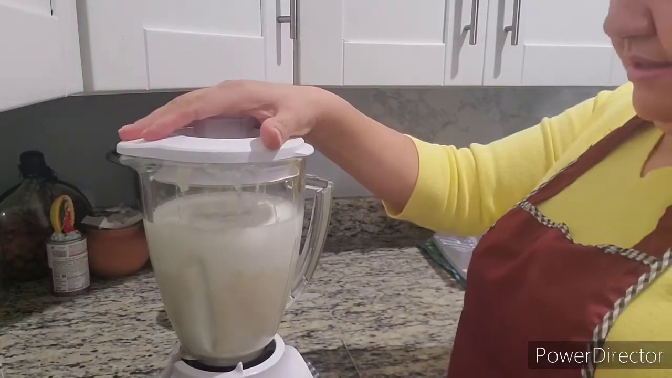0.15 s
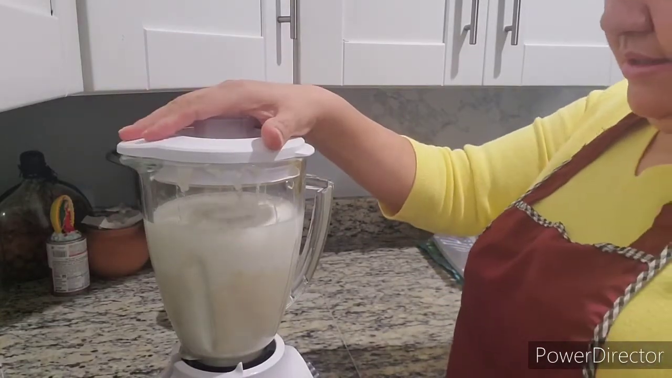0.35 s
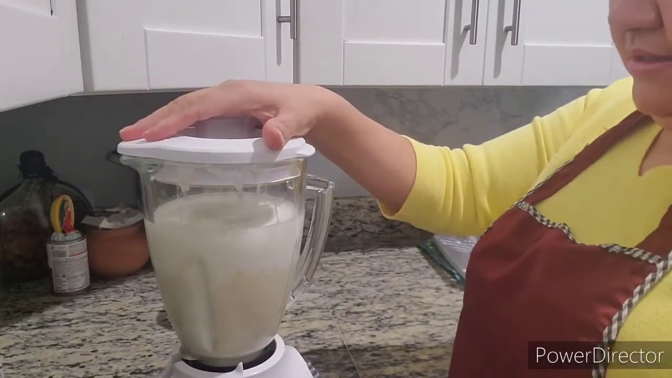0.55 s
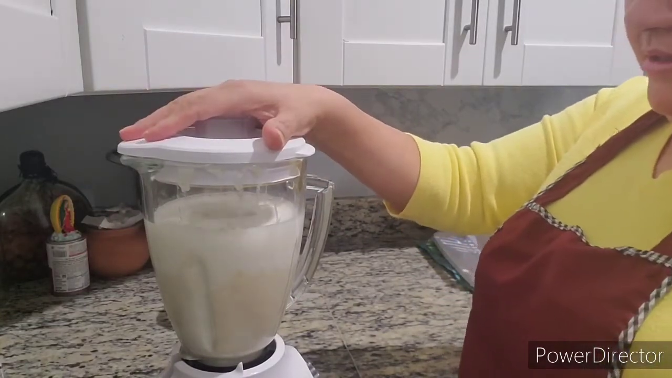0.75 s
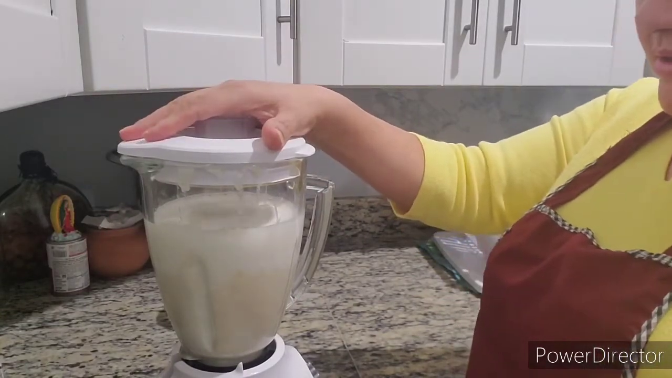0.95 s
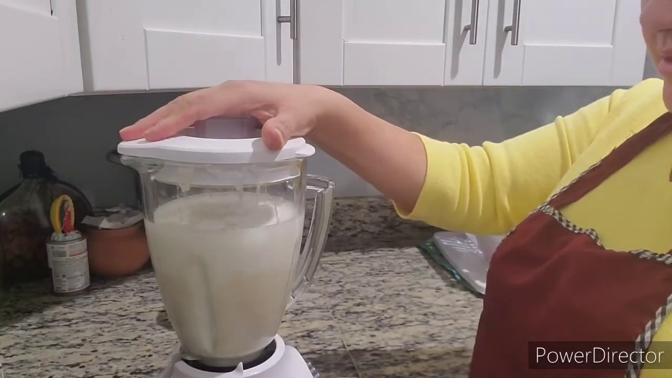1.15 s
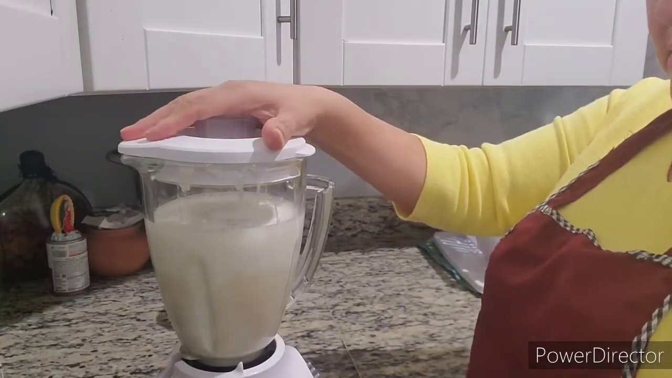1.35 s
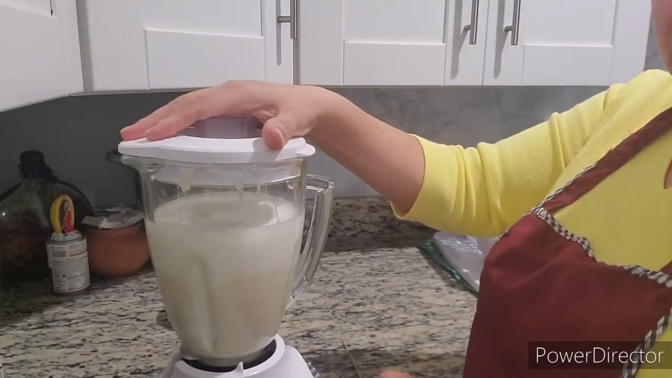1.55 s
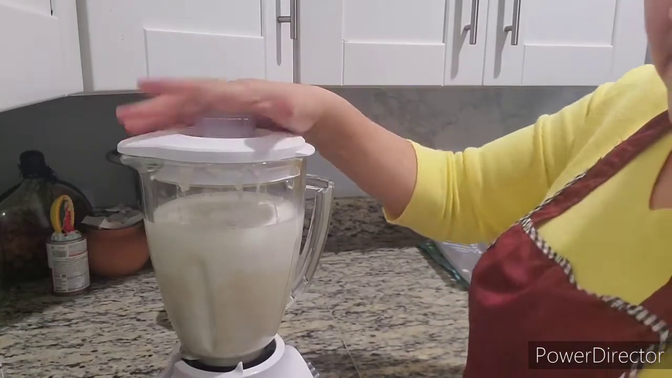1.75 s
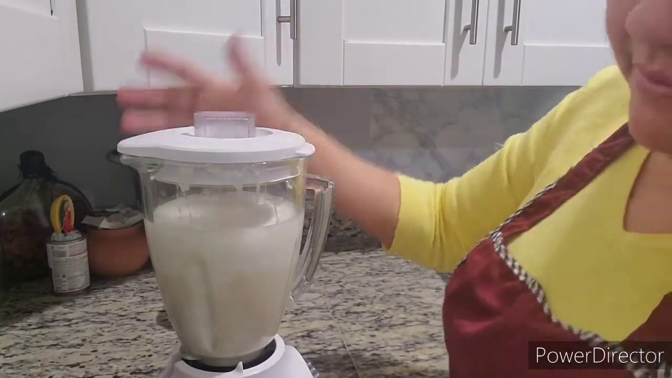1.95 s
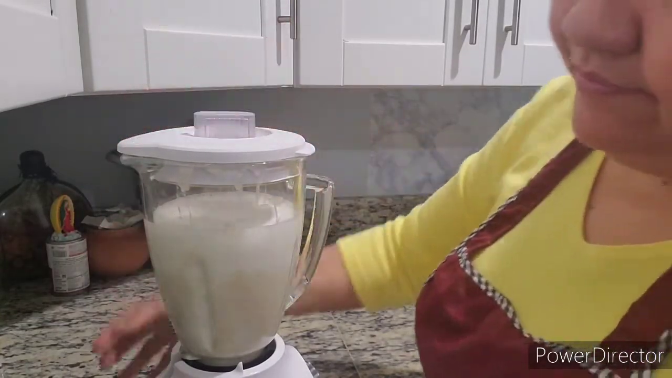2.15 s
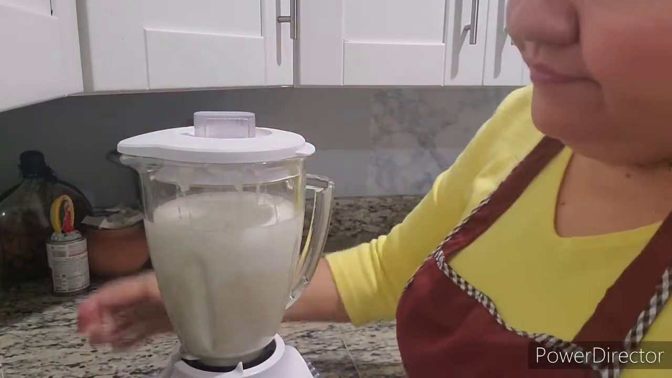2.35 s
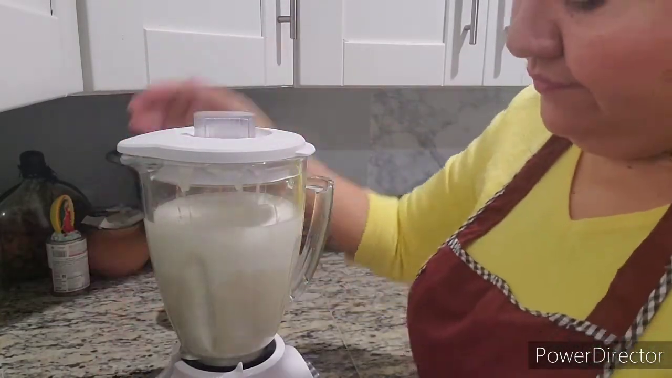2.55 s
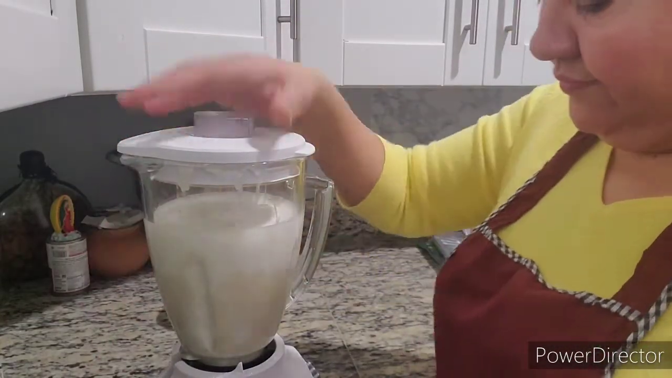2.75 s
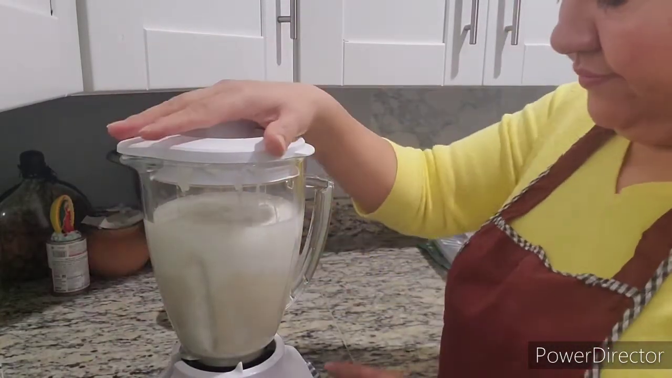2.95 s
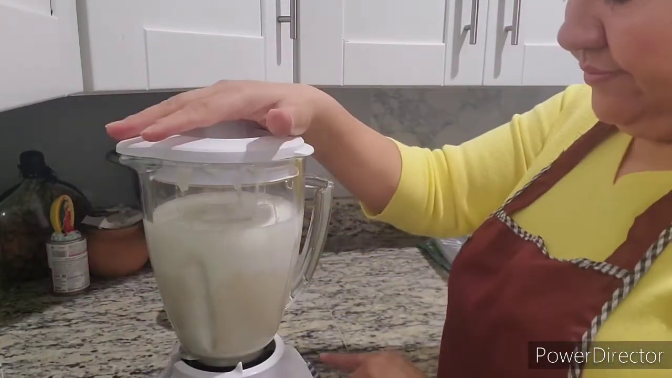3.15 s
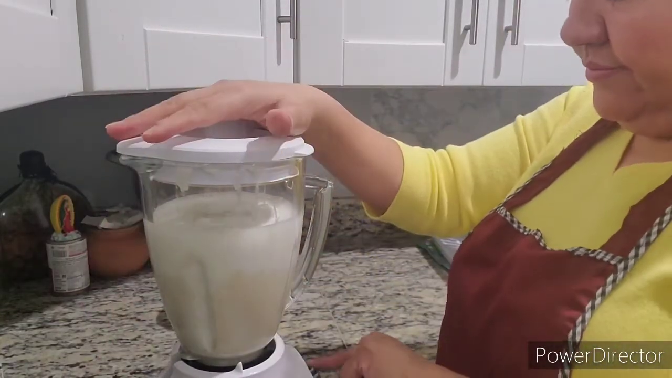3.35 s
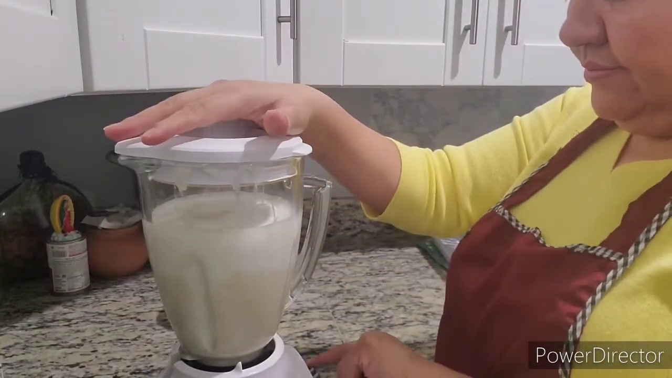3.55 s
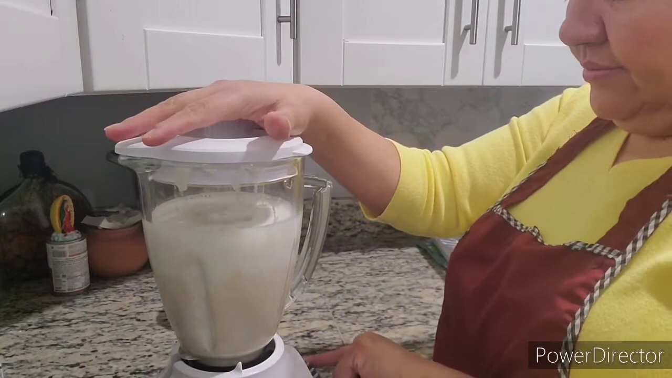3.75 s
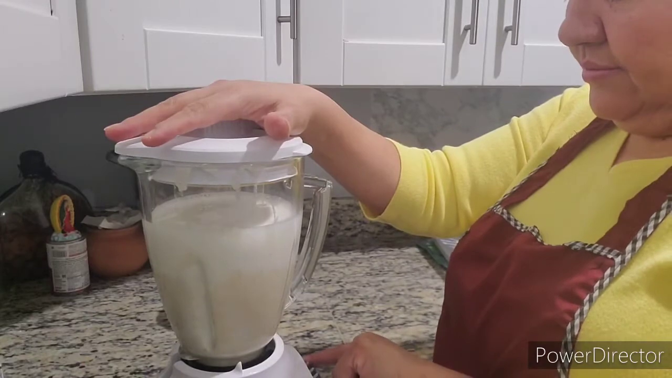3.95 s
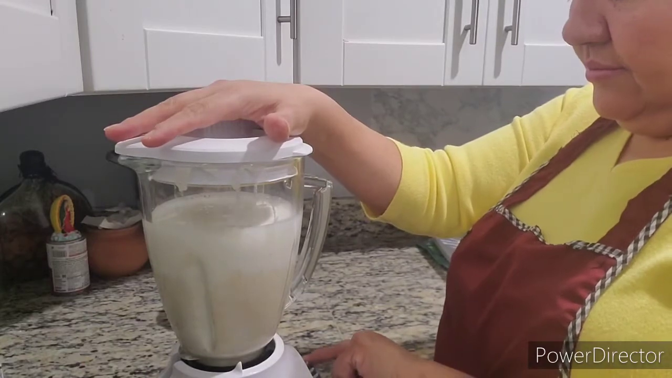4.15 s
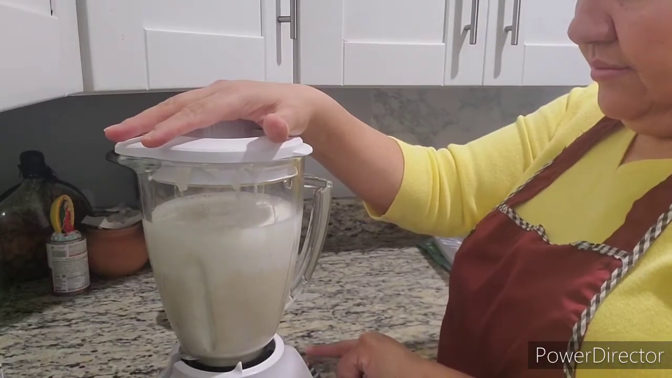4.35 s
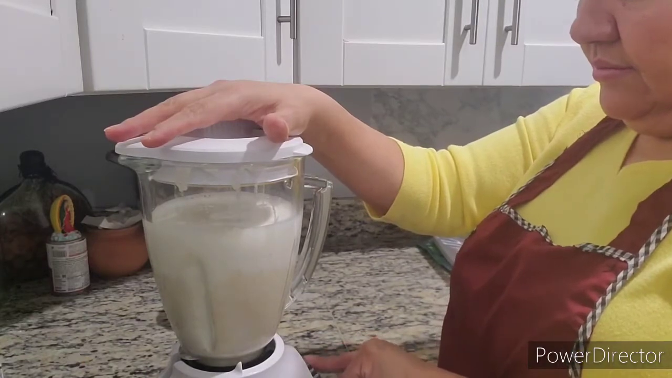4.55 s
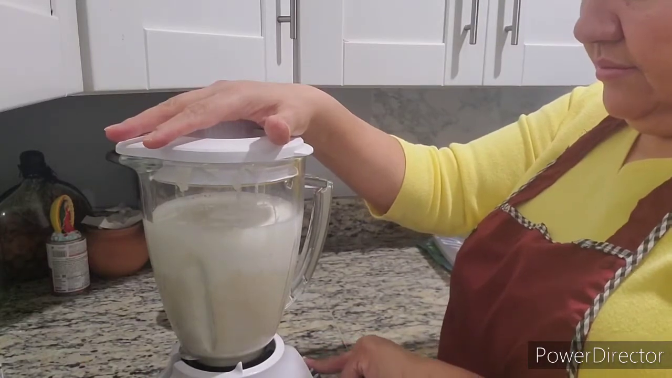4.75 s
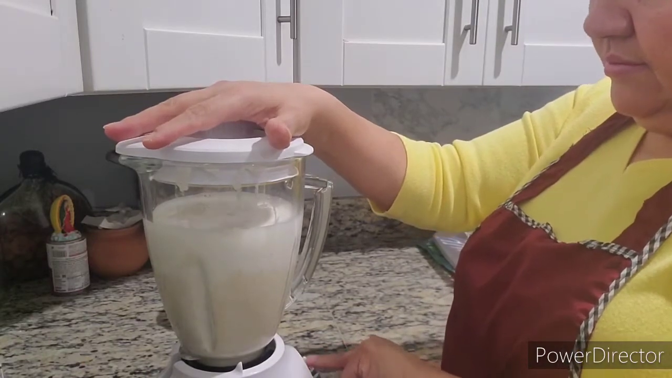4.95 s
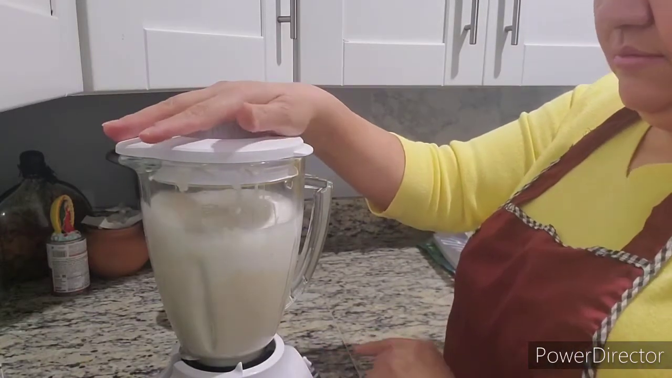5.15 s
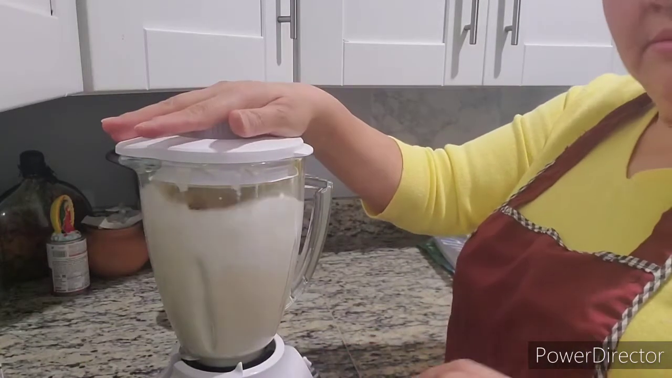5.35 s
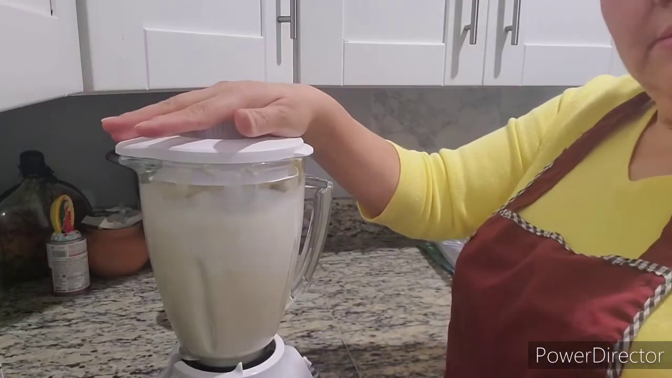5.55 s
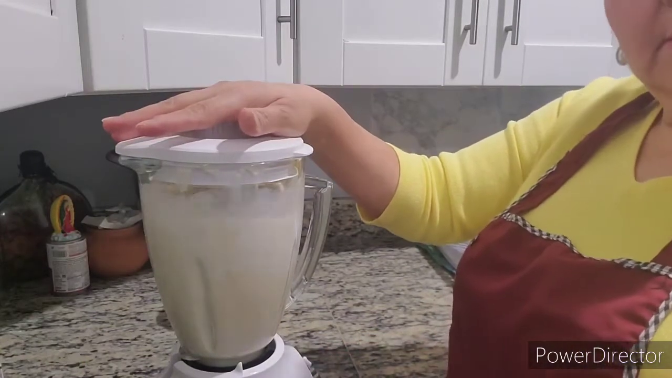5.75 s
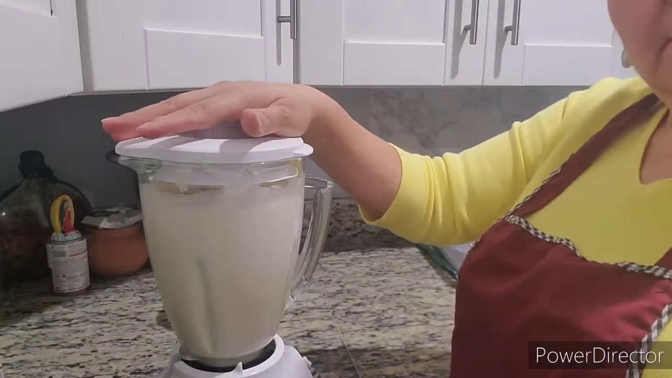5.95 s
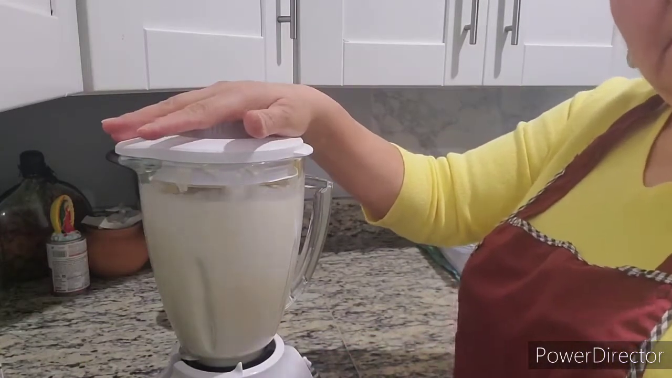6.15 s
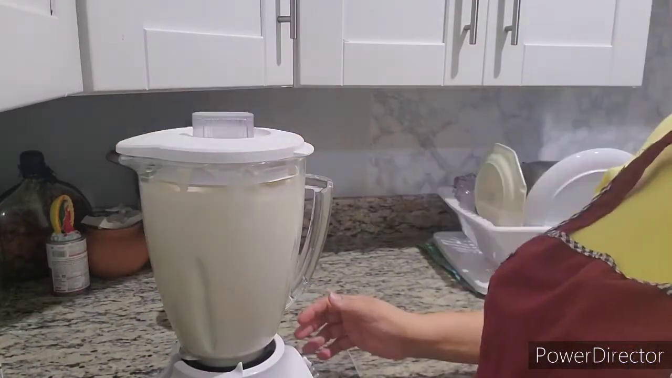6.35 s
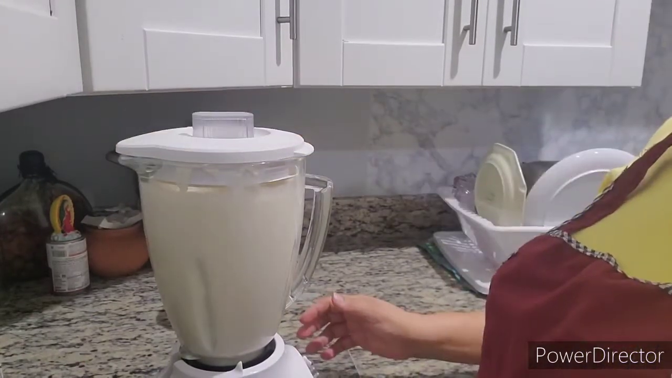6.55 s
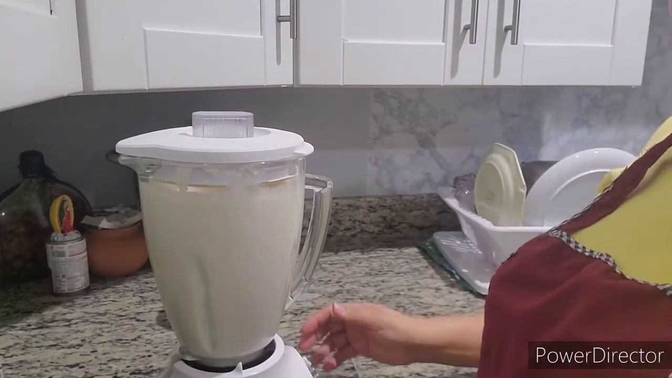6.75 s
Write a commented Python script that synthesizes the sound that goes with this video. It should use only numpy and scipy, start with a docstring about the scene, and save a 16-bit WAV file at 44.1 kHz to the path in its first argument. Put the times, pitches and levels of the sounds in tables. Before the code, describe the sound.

In a quiet humming kitchen, light plastic knocks and skin squeaks precede a hard click; a blender surges up, churning, then brightens into a rattling whine.

```python
"""Over a low room hum, squeaks, rustles and taps are heard as a hand tries the lid and buttons of a blender.
The switch snaps in: hum at multiples of the mains rate and tones locked to the shaft glide up as it winds up.
Filtered noise and random impulses make the churning mix, which leaps against the lid; as a vortex opens
the blades cut into its air, and collapsing cavities ring the resonances of the jar."""
import sys
import numpy as np
from scipy import signal
from scipy.fft import rfft, irfft, next_fast_len
from scipy.io import wavfile

SR = 44100
rng = np.random.default_rng(int(sys.argv[2]) if len(sys.argv) > 2 else 0)


def unload_audio(sound):
    """Save the sound as a 16-bit wav file, at the path given as the first command line argument."""
    columns = np.transpose(np.atleast_2d(sound))
    # keep every value between -1 and 1, then stretch to whole-number steps
    steps = np.round(np.clip(columns, -1, 1) * 32767)
    wavfile.write(sys.argv[1], SR, steps.astype(np.int16))


N = 299553
TIME = np.arange(N) / SR
MAINS_HZ, CUTOFF_HZ = 60, 15500

# In all tables density_db is relative power per Hz, gain_db a relative strength; levels precede any echoes.
# smooth spectrum of the room's air: [freq_hz, density_db]
ROOM_SPECTRUM = [(20, -15), (54, 2.5), (170, -1.5), (220, -6), (282, -13.5), (372, -9), (580, -23),
                 (860, -29), (1200, -32), (1540, -38.5), (2500, -46.5), (6500, -43.5), (8200, -49.5),
                 (15500, -50)]
# steady hum of an appliance: [pitch_hz, rms_db]
ROOM_LINES = [(59.2, -68), (118.4, -58.5), (215.3, -59), (236.9, -59.5), (360.7, -71)]
# thin high tone in the room, and its momentary fade: centre, 1/e half-width, depth
THIN_TONE_HZ, THIN_TONE_DB = 1184, -75
FADE_S, FADE_HALF_S, FADE_DB = 2.45, .42, 16

# strokes of sleeve and palm, with 1/e rise and fall: [peak_s, rise_s, fall_s, level_db]
BRUSHES = [(0.87, .22, .2, -73.5), (1.37, 0.16, 0.27, -75.5), (2.15, 0.42, .2, -77),
           (2.58, 0.13, 0.14, -72), (2.83, 0.11, 0.13, -62.5), (3.35, .25, .2, -70), (3.72, .1, .16, -76),
           (4.35, 0.29, 0.25, -81), (4.72, 0.042, 0.033, -63)]
# smooth spectrum of the rustle: [freq_hz, density_db]
CLOTH_SPECTRUM = [(500, -16), (1500, -2), (3500, 0), (5000, -5), (8000, -12), (15000, -17)]
# skin squeaking over plastic; glide and unsteadiness are shares of the pitch:
# [start_s, length_s, pitch_hz, glide_ratio, unsteady_ratio, level_db]
SQUEAKS = [(2.502, 0.05, 3200, .07, .05, -60), (2.5, 0.07, 1900, .05, .09, -70),
           (2.72, 0.12, 2850, 0, .035, -64.5), (2.74, 0.11, 3960, 0, .02, -67.5),
           (2.75, 0.1, 5300, 0, .025, -75), (3.224, 0.18, 2080, 0.034, .018, -68),
           (3.263, 0.12, 7480, 0, .01, -78)]

# taps, buttons and, last, the switch; ring_peak_db is the peak of the housing's ring, the rest are relative:
# [start_s, ring_peak_db, thump_db, click_db, tick_db, left_right_db]
TAPS = [(0.376, -20.5, -36.5, -39.5, -40.5, 1), (0.556, -33.5, -48, -56, -65, 2),
        (1.048, -37, -53, -45, -52.5, 3), (1.326, -48, -50, -67, -75, 4), (1.519, -48, -48, -67, -85, 4),
        (1.704, -51.5, -49, -64, -62, 3), (2.888, -35.5, -34, -41.5, -52, 3.0),
        (2.911, -29, -46, -42.5, -61, 0), (3.115, -40, -42, -43, -52, 1.5),
        (3.383, -33.5, -50, -44.5, -53, 3), (3.59, -31, -34.5, -73, -83, 1),
        (3.621, -42, -51, -46, -77, 3.5), (3.815, -54, -58, -64, -80, 2),
        (4.186, -48.5, -47, -57, -52.5, 3), (4.425, -46, -55, -54.5, -77, 5.5),
        (4.68, -44, -47, -70, -77, 1), (4.735, -16, -33, -21.5, -25, 3)]
# resonances of the plastic housing and lid: [mode_hz, width_hz, gain_db]
HOUSING_MODES = [(354, 33, 0), (506, 72, 4), (706, 57, 1.5), (828.5, 29, 1), (1007, 190, -10.5),
                 (1247, 91, 0), (1856, 20, -25), (2086, 53, -17.5), (2850, 115, -15), (3470, 120, -17),
                 (4380, 33, -26)]
# smooth spectrum of the dull thump: [freq_hz, density_db]
THUMP_SPECTRUM = [(20, -7), (50, 10.5), (110, 3.5), (250, 6), (600, -44)]
# smooth spectrum of the click of a hard contact: [freq_hz, density_db]
CLICK_SPECTRUM = [(900, 8), (1700, 2), (2700, 2.5), (4300, 2.5), (7000, -8.5), (9500, -30), (15000, -35)]
# smooth spectrum of its bright tick: [freq_hz, density_db]
TICK_SPECTRUM = [(4000, -12), (8000, -1.5), (15000, -3)]

# course of the blend (s): switch closes, mix leaps, vortex opens, it reaches the blades, blades break free
SWITCH_S, SURGE_S, VORTEX_S, DEEP_S, FREE_S = 4.737, 5.29, 5.34, 5.94, 6.625
# spin-up in the thick mix: first kick and full load (turns per s), time constant (s)
KICK_SPEED, LOADED_SPEED, SPIN_UP_S = 38, 147, .155
# vortex: speed gain (turns per s), time constant (s), creep (turns per s, each s), last jump (turns per s)
VORTEX_GAIN, UNLOAD_S, CREEP_PER_S, FREE_GAIN = 58, .18, 12.7, 3.1
# the surge: added level (dB), 1/e rise and fall (s)
SURGE_DB, SURGE_RISE_S, SURGE_FALL_S = 7, 0.09, .06

# smooth spectrum of the sloshing mix: [freq_hz, density_db]
SLOSH_SPECTRUM = [(15, -20), (35, -15), (60, 14), (95, 15.5), (160, 12), (300, -36), (700, -50)]
# lumps of the mix flopping back onto the blades: [peak_s, level_db]
FLOPS = [(4.88, -35), (5.02, -29), (5.35, -28), (5.46, -33), (5.8, -38), (6.14, -44), (6.44, -42)]
FLOP_RISE_S, FLOP_FALL_S = 0.02, 0.049
# smooth spectrum of the churned mix: [freq_hz, density_db]
CHURN_SPECTRUM = [(110, -15), (180, -0.5), (260, -5.5), (350, -1), (550, -1), (630, -12), (1050, 0),
                  (1380, 3), (1600, -6), (2200, -14), (3800, -20), (4600, -28), (7000, -52)]
# resonances of the base and the liquid: [mode_hz, width_hz, gain_db]
BASE_MODES = [(366, 38, 2), (400, 27, -18), (509.5, 29.5, 4), (717, 29, 1), (818, 43, 2), (1031, 66, 4),
              (1150, 40, -8), (1409, 44, 0)]
# smooth spectrum of the froth: [freq_hz, density_db]
FROTH_SPECTRUM = [(1100, -41), (1700, 6.5), (2500, -7), (3250, -0.5), (3600, 7), (4400, -5.5), (6000, -9),
                  (9000, -43)]
# smooth spectrum of the hiss of fan and brushes: [freq_hz, density_db]
HISS_SPECTRUM = [(2500, -11.5), (4000, -3), (4600, -7), (5200, 0), (5800, -6), (7000, -3), (7700, -7.5),
                 (8150, -6), (9200, -9), (13200, -9.5), (15500, -17.5)]
# resonances of the filled jar, low group: [mode_hz, width_hz, gain_db]
JAR_LOW_MODES = [(1875, 26, -12.5), (2154, 65, -4), (2207, 27, 0), (2298, 37, -2)]
# resonances of the filled jar, high group: [mode_hz, width_hz, gain_db]
JAR_HIGH_MODES = [(2437, 77, -3.5), (2698, 127, -1), (2870, 127, -2.5), (3002, 43, 3), (3163, 82, -4),
                  (4066, 47, -10), (4475, 72, -11.5), (5380, 23, -19)]
# reference levels (relative dB), and fading while the vortex thins the mix (dB per s)
CHURN_DB, CHURN_FADE_DB_PER_S = -24.5, 5
HISS_DB, HISS_FADE_DB_PER_S = -26.5, 1.4
SLOSH_DB, SLOSH_FADE_DB_PER_S = -44.5, 6
# midpoint of the onset of cavitation (turns per s)
CAVITATION_SPEED = 101
# jar rings (relative dB): thick mix, gain in the vortex, further gain when deep (high only), loss when free
LOW_RING_DB, LOW_VORTEX_DB, LOW_FREE_DB = -26.2, 8.3, 4.5
HIGH_RING_DB, HIGH_VORTEX_DB, HIGH_DEEP_DB, HIGH_FREE_DB = -27, 3.5, 4.5, 4
# left-right balance of the ring (dB): usual, and while the vortex is deep
RING_PAN_DB, DEEP_PAN_DB = 2.5, -3.5

# mains hum, whose current falls as the motor gathers speed; loss is per turn per s:
# [mains_multiple, standstill_db, loss_db]
HUM = [(2, -12, .148), (6, -29, 0.1)]
# shaking of the base by the unbalanced shaft, against its speed in turns per s: [speed_hz, level_db]
IMBALANCE = [(80, -49), (114, -24.5), (129, -32.5), (146, -25), (172, -26), (188, -42.5), (207, -32),
             (224, -37)]
# rotor tones before load and surge: [speed_multiple, thick_db, vortex_db, free_db]
ROTOR_TONES = [(2, -43.5, -42, -33), (3, -37, -45.5, -46), (4, -28, -39.5, -53), (5, -41, -46, -47),
               (72, -58, -51, -53)]
# commutator whine at full load, and the jar resonance that lifts it near top speed
WHINE_DB, WHINE_LIFT_DB = -35, 14
WHINE_PEAK_HZ, WHINE_WIDTH_HZ = 2668, 58


def from_db(db):
    """Amplitude ratio: 20 dB is a factor of ten."""
    return 10 ** (np.asarray(db) / 20)


def rms_one(x):
    """Power normalisation: scale to unit mean square."""
    return x / np.sqrt(np.mean(x ** 2) + 1e-20)


def panned(db):
    """Level-difference stereo: left and right gains share the difference equally."""
    return from_db(np.array([[.5], [-.5]]) * db)


def drift(rate):
    """Random modulation: Gaussian values joined by straight lines, rate values per s, unit rms."""
    knots = rng.standard_normal(8000)
    return rms_one(np.interp(TIME * rate, np.arange(len(knots)), knots))


def white_pair():
    """Uncorrelated sources: two independent streams of white noise."""
    return rng.standard_normal((2, N))


def coloured(x, spectrum):
    """Spectral shaping: weight each frequency by a smooth curve, then set unit rms."""
    hz, db = np.transpose(spectrum)
    size = next_fast_len(N)
    bins_hz = np.fft.rfftfreq(size, 1 / SR)
    gain = from_db(np.interp(np.log(bins_hz + 1), np.log(hz), db))
    return rms_one(irfft(rfft(x, size) * gain, size)[..., :N])


def resonate(x, modes):
    """Modal superposition: parallel damped resonances of alternating sign, unit rms in sum."""
    out = 0
    for k, (hz, width_hz, db) in enumerate(modes):
        r = np.exp(-np.pi * width_hz / SR)  # a wider mode decays faster
        poles = [1, -2 * r * np.cos(2 * np.pi * hz / SR), r * r]
        gain = (-1) ** k * from_db(db) * (1 - r * r)
        out = out + gain * signal.lfilter([1, 0, -1], poles, x)
    return rms_one(out)


def two_ears(pair, apart_hz):
    """Spatial coherence: long waves reach both ears alike, short ones by unrelated paths."""
    highpass = signal.butter(1, apart_hz, "high", fs=SR, output="sos")
    side = signal.sosfilt(highpass, pair[1])
    return pair[0] + side * np.array([[1], [-1]])


def grains(per_s, spread_db):
    """Random impulse process: two unrelated streams of tiny impulses of uneven size."""
    sizes = from_db(spread_db * np.minimum(rng.exponential(1, (2, N)), 2))
    signs = rng.choice([-1, 1], (2, N))
    present = rng.random((2, N)) < per_s / SR
    return rms_one(sizes * signs * present)


def tone(cycles, db, waver_db):
    """Phase accumulation: a sine of given rms level whose strength wavers."""
    level = np.sqrt(2) * from_db(db + waver_db * drift(25))
    return level * np.sin(2 * np.pi * (cycles + rng.random()))


def after(s, ramp_s):
    """Gradual transition: a smooth step from 0 to 1 around a moment."""
    return .5 + .5 * np.tanh((TIME - s) / ramp_s)


def swell(s, rise_s, fall_s):
    """Gaussian envelope: a rounded bump of height 1 that peaks at a moment."""
    return np.exp(-((TIME - s) / np.where(TIME < s, rise_s, fall_s)) ** 2)


def kitchen(x, wet_db, t60):
    """Reverberation: dense echoes of counter, tiles and cabinets decay 60 dB in t60 seconds."""
    t = TIME[:SR // 2]
    tail = two_ears(rng.standard_normal((2, len(t))), apart_hz=714)
    tail = tail * from_db(-60 * t / t60) * (t > .002)
    tail /= np.sqrt(np.sum(tail ** 2) / 2)
    echoes = signal.fftconvolve(x * np.ones((2, 1)), tail, axes=1)[:, :N]
    return x + from_db(wet_db) * echoes


def room_tone():
    """Broadband and tonal background: low rumble, steady hum, and a thin tone that fades for a moment."""
    air = from_db(-49) * coloured(two_ears(white_pair(), apart_hz=840), ROOM_SPECTRUM)
    lines = sum(tone(hz * TIME, db, waver_db=0.5) for hz, db in ROOM_LINES)
    thin_db = THIN_TONE_DB - FADE_DB * swell(FADE_S, FADE_HALF_S, FADE_HALF_S)
    thin = tone(THIN_TONE_HZ * TIME, thin_db, waver_db=1.0)
    return (air + lines + thin) * panned(db=1.4)


def rustle():
    """Friction noise: sleeve and palm brush past in swelling strokes of uneven strength."""
    strokes = sum(from_db(db) * swell(s, rise_s, fall_s) for s, rise_s, fall_s, db in BRUSHES)
    return strokes * from_db(3.6 * drift(25.05)) * coloured(white_pair(), CLOTH_SPECTRUM)


def squeaks():
    """Stick-slip friction: skin on plastic gives short tones of rough, unsteady pitch."""
    out, slip = 0, drift(900)
    for s, length, hz, glide, unsteady, db in SQUEAKS:
        stroke = np.clip((TIME - s) / length, 0, 1)
        pitch_hz = hz * (1 + glide * stroke + unsteady * slip)
        envelope = np.sqrt(np.abs(np.sin(np.pi * stroke)))
        out = out + tone(np.cumsum(pitch_hz) / SR, db, waver_db=4) * envelope
    return out


def taps():
    """Impact excitation: a touch thumps the counter and rings the housing; hard contacts click and tick."""
    out, t = np.zeros((2, N)), TIME[:SR // 3]
    hard = two_ears(white_pair(), apart_hz=1500)
    click, tick = coloured(hard, CLICK_SPECTRUM), coloured(hard, TICK_SPECTRUM)
    thump = coloured(rng.standard_normal(N), THUMP_SPECTRUM)
    for s, peak_db, thump_db, click_db, tick_db, pan_db in TAPS:
        span = slice(int(s * SR), int(s * SR) + len(t))
        contact = two_ears(rng.standard_normal((2, len(t))), apart_hz=1490)
        body = resonate(contact * from_db(-60 * t / 0.046), HOUSING_MODES)
        body *= from_db(peak_db) / np.abs(body).max()
        snap = from_db(click_db + 5.5) * click[:, span] + from_db(tick_db + 6.5) * tick[:, span]
        snap = snap * from_db(-60 * t / 0.054) * (1 - np.exp(-t / 0.00072))
        knock = from_db(thump_db - 60 * t / 0.21) * (1 - np.exp(-t / 0.0033)) * thump[span]
        out[:, span] += (body + snap + knock) * panned(pan_db)
    return out


def vortex_age():
    """Progressive unloading: seconds for which the vortex has been thinning the mix."""
    return np.clip(TIME, VORTEX_S, FREE_S) - VORTEX_S


def shaft_speed():
    """Exponential approach: turns per s rise against the mix, then again as the vortex takes the load off."""
    running_s = np.maximum(TIME - SWITCH_S, 0)
    spin_up = LOADED_SPEED - (LOADED_SPEED - KICK_SPEED) * np.exp(-running_s / SPIN_UP_S)
    age = vortex_age()
    unloading = VORTEX_GAIN * (1 - np.exp(-age / UNLOAD_S)) + CREEP_PER_S * age
    return spin_up + unloading + FREE_GAIN * after(FREE_S, ramp_s=.01)


def stirring_db(speed, follows):
    """Power law: level grows with blade speed until the mix is fully moving."""
    return follows * 20 * np.log10(np.minimum(speed / LOADED_SPEED, 1))


def surge_db():
    """Transient loading: the level swells as the mix piles up and leaps against the lid."""
    return SURGE_DB * swell(SURGE_S, SURGE_RISE_S, SURGE_FALL_S)


def slosh():
    """Bulk fluid motion: low noise fades with the vortex and swells as lumps flop back onto the blades."""
    flops = sum(from_db(db) * swell(s, FLOP_RISE_S, FLOP_FALL_S) for s, db in FLOPS)
    strength = from_db(SLOSH_DB - SLOSH_FADE_DB_PER_S * vortex_age()) + flops
    return strength * coloured(two_ears(white_pair(), apart_hz=600), SLOSH_SPECTRUM)


def churn(speed):
    """Turbulent excitation: many small impulses sound in the mix and excite the base and liquid."""
    db = CHURN_DB + stirring_db(speed, follows=1.2) + surge_db() - CHURN_FADE_DB_PER_S * vortex_age()
    swirl = coloured(two_ears(grains(per_s=5000, spread_db=1.5), apart_hz=945), CHURN_SPECTRUM)
    knocks = resonate(two_ears(grains(per_s=3000, spread_db=2.5), apart_hz=1190), BASE_MODES)
    return from_db(db + 1.0 * drift(40)) * from_db(-1.0) * (swirl + knocks)


def jar_ring(speed):
    """Cavitation: collapsing cavities excite the jar's modes, the high group more as the vortex deepens."""
    opened = after(VORTEX_S + 0.069, ramp_s=0.031)
    deep, free = after(DEEP_S, ramp_s=0.037), after(FREE_S, ramp_s=0.085)
    low_db = LOW_RING_DB + LOW_VORTEX_DB * opened - LOW_FREE_DB * free
    high_db = HIGH_RING_DB + HIGH_VORTEX_DB * opened + HIGH_DEEP_DB * deep - HIGH_FREE_DB * free
    low_hits = two_ears(grains(per_s=6000, spread_db=0.5), apart_hz=3150) * from_db(0.53 * drift(150))
    high_hits = two_ears(grains(per_s=6000, spread_db=3), apart_hz=2530)
    low = from_db(low_db) * resonate(low_hits, JAR_LOW_MODES)
    high = from_db(high_db) * resonate(high_hits, JAR_HIGH_MODES)
    cavitating = .5 + .5 * np.tanh((speed - CAVITATION_SPEED) / 15)
    band = signal.butter(2, [1600, 5800], "band", fs=SR, output="sos")
    ring = signal.sosfilt(band, cavitating * (low + high))
    return ring * panned(RING_PAN_DB + (DEEP_PAN_DB - RING_PAN_DB) * deep * (1 - free))


def froth_and_hiss(speed):
    """Broadband flow noise: dense fine impulses give the froth and the hiss of fan and brushes."""
    db = HISS_DB + stirring_db(speed, follows=1.05) - HISS_FADE_DB_PER_S * vortex_age()
    froth = coloured(two_ears(grains(per_s=12000, spread_db=4), apart_hz=900), FROTH_SPECTRUM)
    hiss = coloured(two_ears(grains(per_s=25000, spread_db=3.5), apart_hz=900), HISS_SPECTRUM)
    return from_db(db + 1.5) * froth + from_db(db + 2) * hiss


def liquid():
    """Superposition of flow sources: slosh, churn, froth and hiss join the ring of the jar."""
    speed = shaft_speed()
    flow = slosh() + churn(speed) + froth_and_hiss(speed)
    return flow * panned(db=2.0) + jar_ring(speed)


def rotor(speed, turns):
    """Rotational harmonics: imbalance sweeps through the base's resonances; multiples follow the load."""
    out = tone(turns, np.interp(speed, *np.transpose(IMBALANCE)), waver_db=1.3)
    load_db = stirring_db(speed, follows=4.5) + surge_db()
    opened, free = after(VORTEX_S + .02, ramp_s=0.029), after(FREE_S, ramp_s=0.036)
    for k, thick_db, vortex_db, free_db in ROTOR_TONES:
        db = thick_db + (vortex_db - thick_db) * opened + (free_db - vortex_db) * free
        out = out + tone(round(k) * turns, db + load_db, waver_db=3.0)
    return out


def commutator_whine(speed, turns):
    """Periodic contact: brushes cross twelve segments a turn, and a jar resonance lifts the tone."""
    segments = 12
    lift = np.exp(-((segments * speed - WHINE_PEAK_HZ) / WHINE_WIDTH_HZ) ** 2)
    db = WHINE_DB + stirring_db(speed, follows=1.9) + WHINE_LIFT_DB * lift
    return tone(segments * turns, db, waver_db=1.5)


def mains_hum(speed):
    """Magnetic forcing: the field coils hum at mains multiples, weaker as speed lowers the current."""
    return sum(tone(round(k) * MAINS_HZ * TIME, db - loss_db * speed, waver_db=1.6)
               for k, db, loss_db in HUM)


def motor():
    """Phase locking: rotor and whine share one shaft angle, whose speed trembles; the coils hum apart."""
    speed = shaft_speed()
    # thick liquid drags unevenly at the blades; at full speed they spin freely
    tremble = np.interp(speed, [140, 215], [.007, .0008])
    turns = np.cumsum(speed * (1 + tremble * drift(70))) / SR
    body = rotor(speed, turns) + mains_hum(speed)
    return body * panned(db=1.0) + commutator_whine(speed, turns) * panned(db=9.5)


def scene():
    """Superposition of sources: room and hand are joined by the blender once the switch closes."""
    running = np.clip((TIME - SWITCH_S) / 0.013, 0, 1)
    hand = kitchen(taps() + rustle() + squeaks(), wet_db=0.0, t60=0.26)
    mix = kitchen(running * liquid(), wet_db=-9.5, t60=0.3) * from_db(-0.23)
    return room_tone() + hand + mix + running * motor()


def record(dry):
    """Band limitation: a steep low-pass filter removes the extreme treble."""
    return signal.sosfilt(signal.ellip(10, .2, 80, CUTOFF_HZ, fs=SR, output="sos"), dry)


dry = scene()
out = record(dry)
unload_audio(out)
```